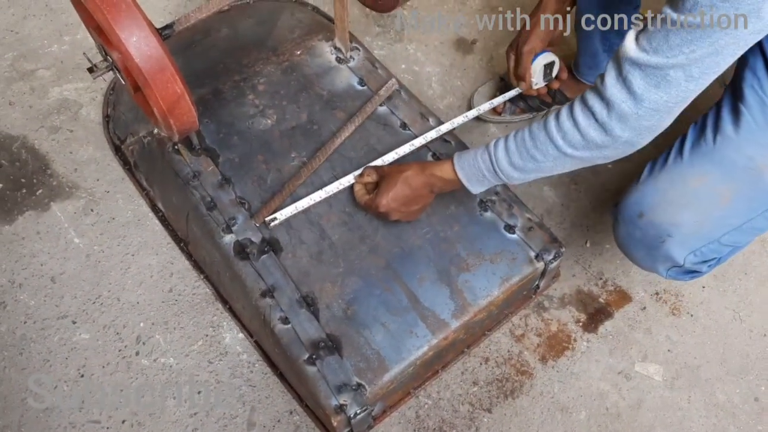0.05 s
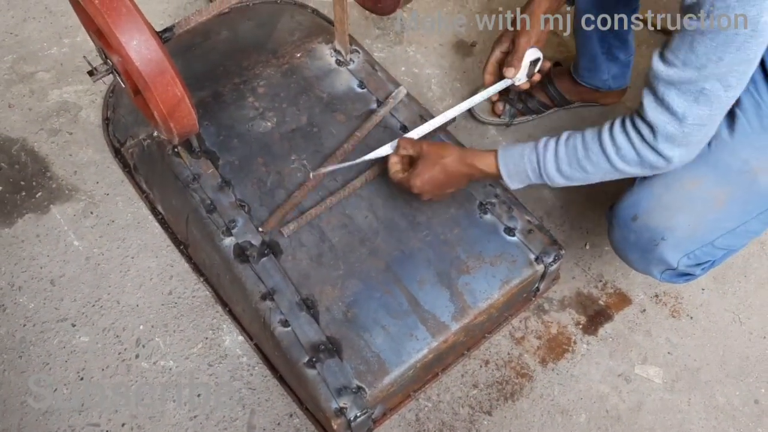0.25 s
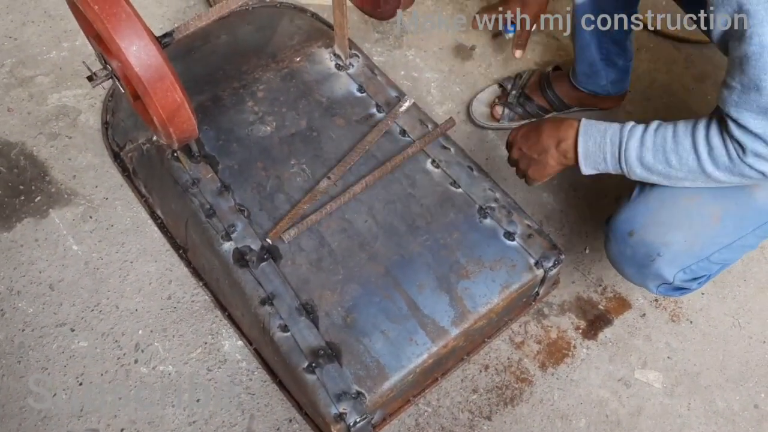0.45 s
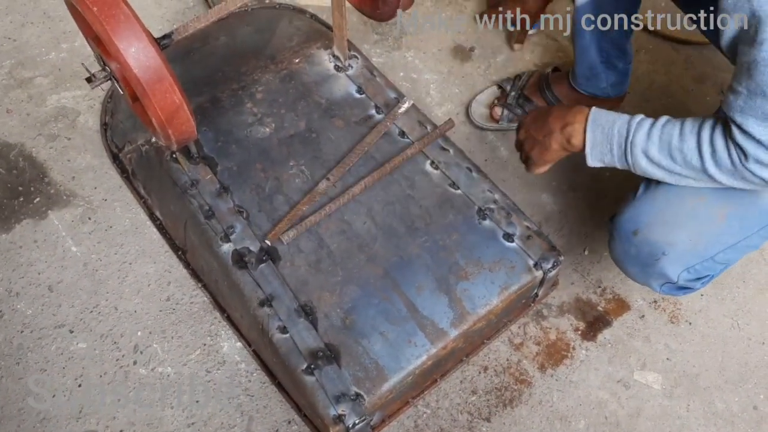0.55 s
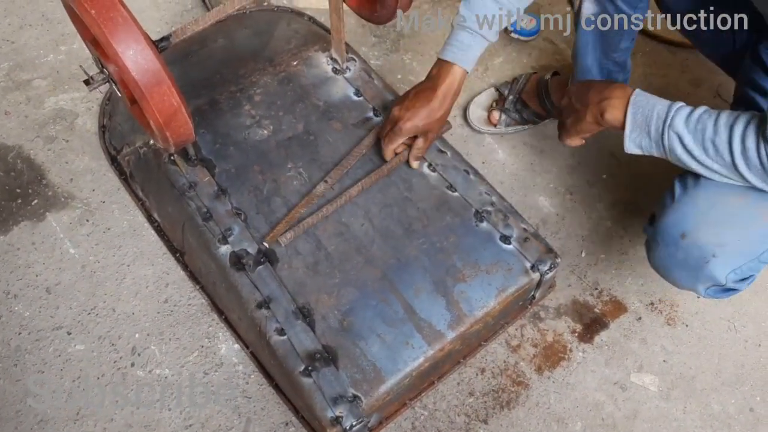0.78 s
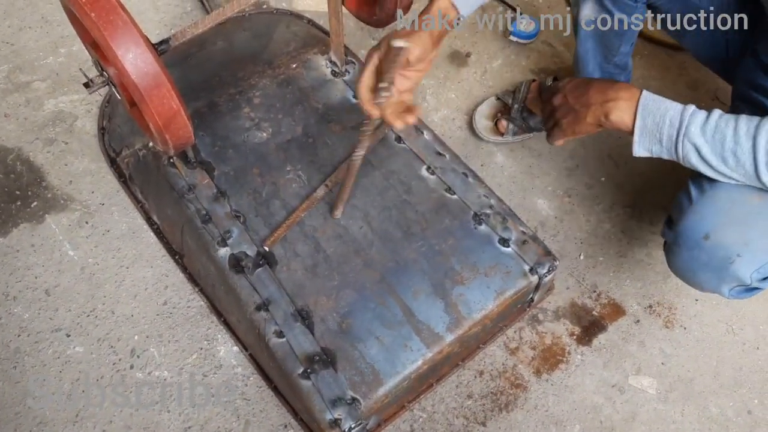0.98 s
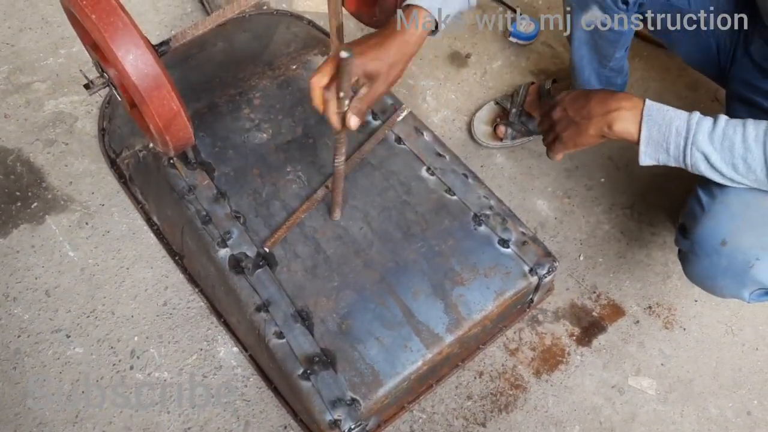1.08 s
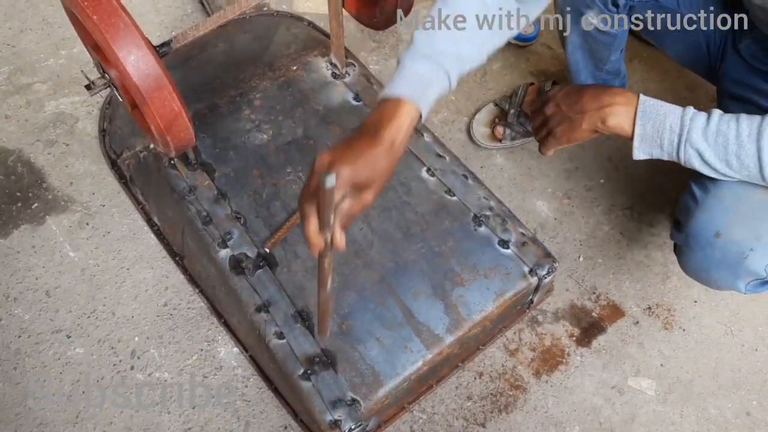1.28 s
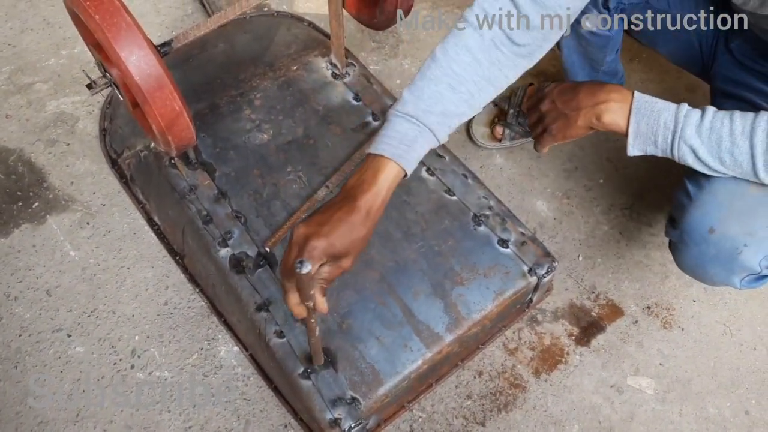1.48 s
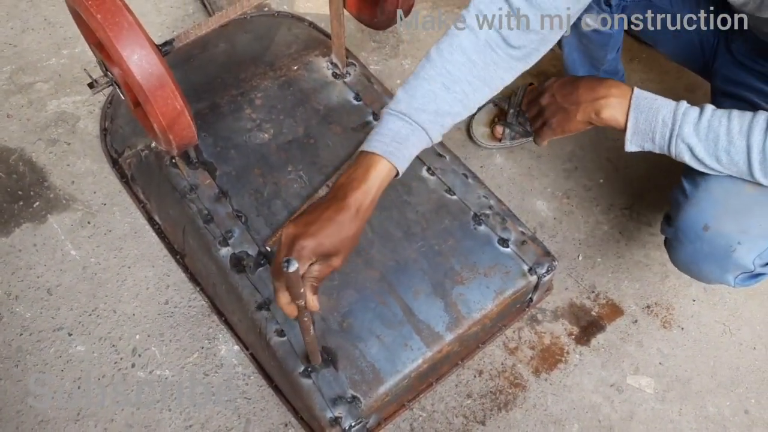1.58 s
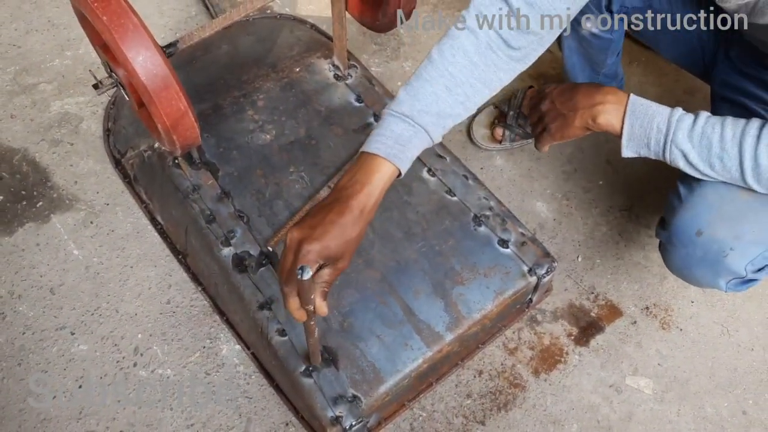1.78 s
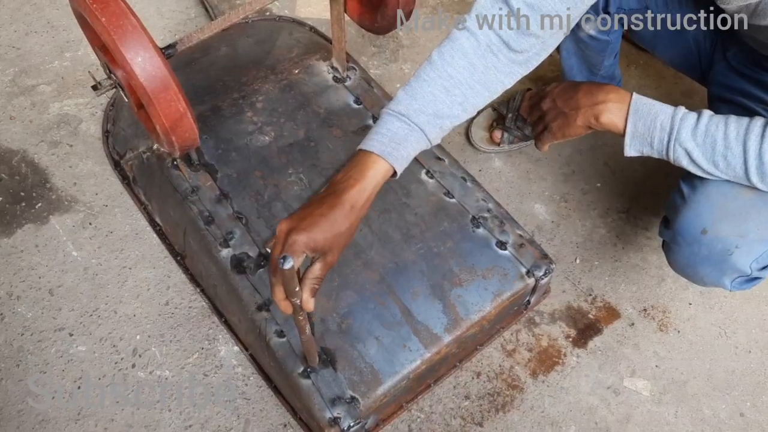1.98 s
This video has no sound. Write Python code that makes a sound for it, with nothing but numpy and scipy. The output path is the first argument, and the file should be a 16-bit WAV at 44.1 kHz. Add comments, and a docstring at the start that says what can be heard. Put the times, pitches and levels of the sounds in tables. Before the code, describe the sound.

A steel tape measure skids back over a metal tray and snaps into its case. A rod is then dragged off the tray with a chattering scrape and set down with a ringing knock, close by in a quiet workshop.

```python
"""A workshop, close to a welded steel tray, heard on a stereo pair of microphones.
A steel tape measure runs back over the tray, skids and slaps on it, and snaps into its case.
A metal rod is dragged off the tray, sticking and slipping, then stood on it with a bouncing knock
and a small nudge. The tray rings under both. Behind them lie low room noise, a hum with thin whines
and the rustle of a sleeve."""
import sys
import numpy as np
from scipy import signal
from scipy.fft import rfft, irfft
from scipy.io import wavfile
from scipy.ndimage import uniform_filter1d

SR = 44100
rng = np.random.default_rng(int(sys.argv[2]) if len(sys.argv) > 2 else 0)


def store_pcm(level_fs):
    """Save levels as 16-bit WAV."""
    pcm = np.round(np.clip(level_fs, -1, 1) * 32767).astype(np.int16)
    wavfile.write(sys.argv[1], SR, np.atleast_2d(pcm).T)


N = 90404
TIME = np.arange(N) / SR
RING_TIME = np.arange(26000) / SR

# blade sliding on the tray (time [s], level [dB])
BLADE_SLIDE = [(.18, -38), (.186, -23.5), (.206, -16.5), (.24, -16), (.265, -25), (.3, -27), (.315, -20.5),
               (.337, -27), (.355, -56.5), (.365, -54)]
# blade slapping the tray (time [s], strength [dB])
BLADE_SLAPS = [(.207, 6), (.216, 3), (.2335, 6), (.2395, 6.5), (.283, 9)]
# tray's dense ring under the blade (frequency [Hz], level [dB])
BLADE_COLOUR = [(50, -29.5), (100, -17), (150, 5), (300, -4.5), (700, -2), (1500, -10.5), (2400, -11),
                (4500, -17), (7000, -33.5), (16000, -36)]
# blade hissing through the mouth of the case (time [s], level [dB])
BLADE_HISS = [(.18, -48), (.22, -44), (.26, -26), (.285, -43), (.362, -51.5), (.366, -29.5), (.385, -30),
              (.405, -28), (.415, -55), (.44, -44)]
# spectrum of that hiss (frequency [Hz], level [dB])
HISS_COLOUR = [(100, -48.5), (1500, -19.5), (3000, -0.5), (5500, -7), (7500, 1), (10000, -7), (12000, 5),
               (16000, -3.5)]
# sharp clicks: the tape and its hook snapping into the case, then lighter clicks of the rod or hand (time [s],
# strength [dB])
SNAPS = [(.2217, 6), (.2235, 13.5), (.3935, 3.5), (.406, 0), (.579, -12.5), (.587, -18), (.598, -15),
         (.6225, -27.5)]
# spectrum of those clicks (frequency [Hz], level [dB])
SNAP_COLOUR = [(30, -45.5), (100, -25.5), (700, -29.5), (2500, 5.5), (5000, -2), (9500, -2.5), (12000, 2.5),
               (16000, 2.5)]


def tape_measure():
    """Up front, the blade skids and slaps over the tray, hisses into the case and clicks home."""
    body = tray(BLADE_COLOUR, UNDER_TAPE, modes_db=1, crack_db=-1, sustain=0.59)
    friction = grains(spread_db=1) * level(BLADE_SLIDE)
    skid = excite(friction + blows(BLADE_SLAPS), body)
    rush = rng.standard_normal(N) * level(BLADE_HISS)
    hiss = excite(rush, ring(HISS_COLOUR, crack_db=1, crack_s=0.001))
    clicks = excite(blows(SNAPS), ring(SNAP_COLOUR, crack_db=2, crack_s=0.0033))
    return skid + hiss + clicks


# rod's end striking the tray (time [s], strength [dB], low-pass cutoff [Hz], clack [dB])
KNOCKS = [(1.373, 16.5, 14000, 8), (1.3775, 6.5, 5000, 1.5), (1.3938, 0, 5000, 7.5), (1.3979, 12, 2500, 4),
          (1.4061, 9.5, 3050, -3)]
# tray's dense ring under the rod's end (frequency [Hz], level [dB])
KNOCK_COLOUR = [(55, -30.5), (105, -25), (155, 2), (300, -5), (550, 0.5), (1000, -9.5), (2200, -4.5),
                (3200, -11.5), (4800, -12), (5800, -26), (9000, -29.5), (16000, -34.5)]
# hard clack of metal on metal (frequency [Hz], level [dB])
CLACK_COLOUR = [(200, -20), (1200, -0.5), (2300, 1), (3200, -4), (4800, -2.5), (6200, -15), (16000, -31.5)]


def rod_knock():
    """The rod's end lands with a hard clack and bounces; the later contacts are softer and duller."""
    force = np.zeros(N)
    for start, db, cutoff_hz, _ in KNOCKS:
        pole = np.exp(-2 * np.pi * cutoff_hz / SR)
        force += signal.lfilter([1 - pole], [1, -pole], blows([(start, db)]))
    taps = blows([(start, clack_db) for start, _, _, clack_db in KNOCKS])
    clack = excite(taps, ring(CLACK_COLOUR, crack_db=3.5, crack_s=0.0019))
    body = tray(KNOCK_COLOUR, UNDER_ROD_END, modes_db=-3, crack_db=-4.5, sustain=0.98)
    return clack + excite(force, body)


# rod dragged off the tray (time [s], chatter [dB], grit [dB])
DRAG = [(.8, -46, -67), (.815, -29, -40), (.845, -30, -33), (.878, -30, -24.5), (.915, -24, -18),
        (.94, -27, -23), (.98, -24, -27.5), (.998, -23, -31.5), (1.014, -61.5, -55)]
# tray's dense ring under the slips (frequency [Hz], level [dB])
CHATTER_COLOUR = [(50, -49), (100, -11.5), (150, 4), (230, 13.5), (320, -5.5), (900, -4), (2000, -5),
                  (5000, -25.5), (16000, -44.5)]
# tray's dense ring under grinding rust (frequency [Hz], level [dB])
GRIT_COLOUR = [(30, -48), (100, -32.5), (300, -12), (950, -0.5), (1500, -13.5), (2050, -3), (3100, -5),
               (3900, -8), (6000, -17.5), (10000, -27), (16000, -35.5)]


def rod_drag(mean_slip_hz=156.87, jitter=0.16, grind_fall_db=18.5):
    """The rod sticks and slips unevenly; rust grinds under it, hardest just after each slip."""
    wander = evened(uniform_filter1d(rng.standard_normal(N), size=160))
    cycles = np.cumsum(mean_slip_hz * (1 + jitter * wander)) / SR
    onsets = np.diff(np.floor(cycles), prepend=0)  # one slip per cycle
    slips = evened(onsets * amp(2.5 * wander))
    rust = evened(grains(spread_db=3.5) * amp(-grind_fall_db * (cycles % 1)))
    chatter_body = tray(CHATTER_COLOUR, UNDER_DRAG, modes_db=-4, crack_db=2.5, sustain=0.95)
    grit_body = tray(GRIT_COLOUR, UNDER_DRAG, modes_db=0, crack_db=5.5, sustain=0.76)
    chatter = excite(slips * level(DRAG, column=1), chatter_body)
    grit = excite(rust * level(DRAG, column=2), grit_body)
    return chatter + grit


# light shifts of metal on the tray (start [s], length [s], rub [dB], scratch [dB])
NUDGES = [(0.563, 0.041, -46, -38), (0.591, 0.092, -39.5, -54.5), (1.617, 0.014, -40, -54.5),
          (1.63, 0.027, -43.5, -65)]
# spectrum of the dull rub (frequency [Hz], level [dB])
NUDGE_COLOUR = [(30, -39), (110, -11.5), (210, 10.5), (330, -7), (800, 2.5), (1500, -8.5), (2600, -13),
                (6000, -30.5), (16000, -42)]


def nudges():
    """Brief light scuffs of metal on the tray: a dull rub and a bright scratch."""
    rub, scratch = np.zeros((2, N))
    for start, length, rub_db, scratch_db in NUDGES:
        friction = swell(start, length) * grains(spread_db=1)
        rub += amp(rub_db) * friction
        scratch += amp(scratch_db) * friction
    body = tray(NUDGE_COLOUR, UNDER_ROD_END, modes_db=-6, crack_db=15, sustain=0.94)
    return excite(rub, body) + excite(scratch, ring(CLACK_COLOUR, crack_db=2.5, crack_s=0.0022))


# tray modes (frequency [Hz], base t60 [s], level under tape [dB], dragged rod [dB], rod's end [dB])
TRAY_MODES = [(165, .28, -13, -7, -9), (223, .2, -8, -15, -7), (322, .25, -25, -22, -5),
              (368, .17, -13, -20, -10), (452, .17, -19, -21, -14), (570, .15, -19, -21, -9),
              (705, .24, -10, -12, -17), (838, .35, -16, -18, -6), (885, .33, -17, -8, -13),
              (931, .28, -11, -9, -20), (1111, .33, -13, -15, -10), (1176, .42, -15, -21, -14),
              (1385, .36, -27, -19, -20), (1631, .22, -28, -24, -16), (1899, .24, -24, -9, -10),
              (2010, .16, -23, -15, -17), (2132, .17, -17, -21, -14), (2243, .17, -18, -21, -17),
              (2391, .17, -20, -17, -15), (2540, .2, -24, -18, -20), (2991, .16, -25, -19, -17)]
UNDER_TAPE, UNDER_DRAG, UNDER_ROD_END = 2, 3, 4  # level columns


def tray(colour, place, modes_db, crack_db, sustain):
    """The tray's response to a tap at one place; sustain scales how long its modes ring there."""
    modes = np.zeros((2, len(RING_TIME)))
    for row in TRAY_MODES:
        hz, t60 = row[:2]
        # each mode reaches the two microphones with its own phase gap
        phase_gap = np.arccos(np.clip(read(LIKENESS, hz), -1, 1))
        phases = phase_gap * rng.choice([-.5, .5]) * np.array([[1], [-1]])
        decay = amp(-60 * RING_TIME / (t60 * sustain))
        modes += amp(row[place] + modes_db) * unit(np.sin(2 * np.pi * hz * RING_TIME + phases) * decay)
    radiation = signal.butter(4, 148, "highpass", fs=SR, output="sos")  # the tray radiates little bass
    return unit(ring(colour, crack_db, crack_s=0.0087) + signal.sosfilt(radiation, modes))


# decay of the tray's dense upper modes and the room together (frequency [Hz], t60 [s])
RING_DECAY = [(60, 0.11), (200, 0.09), (500, 0.22), (1000, 0.28), (2000, 0.22), (4000, 0.18), (8000, 0.18),
              (16000, 0.028)]


def ring(colour, crack_db, crack_s):
    """Response to one tap: a short crack, then a dense ring that dies by band."""
    size = len(RING_TIME)
    hz, t, bands = signal.stft(diffuse(size), SR, nperseg=256)
    decay = amp(-60 * t / read(RING_DECAY, hz)[:, None])
    tail = signal.istft(bands * decay, SR, nperseg=256)[1][:, :size]
    crack = diffuse(size) * np.exp(-RING_TIME / crack_s)
    return unit(coloured(unit(tail) + amp(crack_db) * unit(crack), colour))


# workshop background (time [s], level [dB])
ROOM_LEVEL = [(0, -36), (.17, -41), (.35, -43.5), (.53, -50), (.68, -46.5), (.78, -46.5), (1.1, -42.5),
              (1.35, -43.5), (1.45, -40), (1.6, -55.5), (1.9, -58.5), (2.05, -54.5)]
# low room noise (frequency [Hz], level [dB])
ROOM_COLOUR = [(25, -24.5), (60, -7.5), (100, -1), (150, -12), (205, 5.5), (260, -2), (400, -4),
               (650, -7.5), (1200, -21.5), (2300, -21.5), (3300, -28), (6000, -34), (16000, -51)]
# faint metallic shimmer (frequency [Hz], level [dB])
SHIMMER_COLOUR = [(100, -34), (400, -7.5), (1200, 0), (2400, -1), (3200, -6.5), (4500, -13), (8000, -43)]


def room_tone(shimmer_db=-8):
    """The workshop behind the tray: low noise and a faint metallic shimmer rise and fall together."""
    shimmer = excite(rng.standard_normal(N), ring(SHIMMER_COLOUR, crack_db=-18.5, crack_s=0.0024))
    rumble = coloured(diffuse(N), ROOM_COLOUR)
    return (evened(rumble) + amp(shimmer_db) * evened(shimmer)) * level(ROOM_LEVEL)


# sleeve and hand moving (time [s], level [dB])
RUSTLE = [(0, -52.5), (.08, -81), (.13, -57), (.2, -75.5), (.5, -66.5), (.75, -80), (.81, -53.5),
          (1.05, -63), (1.18, -80), (1.3, -96)]
# spectrum of their rustle (frequency [Hz], level [dB])
RUSTLE_COLOUR = [(100, -23.5), (2000, -0.5), (7000, -5.5), (12000, -10), (16000, -16)]


def sleeve_rustle():
    """A moving arm makes soft swells of bright noise."""
    return evened(coloured(diffuse(N), RUSTLE_COLOUR)) * level(RUSTLE)


# workshop hum and thin whines (frequency [Hz], level relative to the hum [dB])
HUM = [(200, 0), (1637, -17), (1825, -14), (1880, -16), (2073, -13), (2256, -13), (2400, -17)]
# passing tones and high chirps (start [s], length [s], pitch [Hz], width [Hz], level [dB])
TONES = [(0.03, 0.064, 1690, 15, -50), (0.101, 0.062, 2313, 15, -47), (1.09, .09, 1635, 10, -53),
         (1.325, .045, 6300, 250, -63), (1.665, .1, 6050, 250, -74)]


def faint_tones(hum_db=-8):
    """Far back, a hum and thin whines follow the room's level; a few tones and chirps come and go."""
    tones = sum(amp(db + hum_db) * thin_tone(hz, width_hz=3) for hz, db in HUM) * level(ROOM_LEVEL)
    for start, length, hz, width_hz, db in TONES:
        tones += amp(db) * swell(start, length) * thin_tone(hz, width_hz)
    return tones


def thin_tone(hz, width_hz):
    """A narrow band of noise: a wavering tone."""
    band = np.exp(-((np.fft.rfftfreq(N, 1 / SR) - hz) / width_hz) ** 2)
    return evened(irfft(rfft(diffuse(N)) * band, N))


# likeness of the left and right microphones (frequency [Hz], correlation [0-1])
LIKENESS = [(30, 0.6), (70, 0.93), (190, 1), (380, 0.79), (700, 0.74), (1300, 0), (2400, 0.14), (5000, 0)]


def diffuse(size):
    """Noise at the two microphones, alike in the bass and unrelated in the treble."""
    left, unrelated = np.exp(2j * np.pi * rng.random((2, size // 2 + 1)))
    likeness = np.clip(read(LIKENESS, np.fft.rfftfreq(size, 1 / SR)), -1, 1)
    right = likeness * left + np.sqrt(1 - likeness ** 2) * unrelated
    return irfft(np.array([left, right]), size)


def grains(spread_db, catches_per_s=2500):
    """Friction: many tiny catches of uneven size."""
    sizes = amp(spread_db * np.minimum(rng.exponential(1, N), 4))
    signs = rng.choice([-1, 1], N)
    catches = rng.random(N) < catches_per_s / SR
    return evened(sizes * signs * catches)


def blows(rows):
    """One impulse per row of (time [s], strength [dB])."""
    force = np.zeros(N)
    for start, db in rows:
        force[round(start * SR)] += amp(db)
    return force


def excite(force, response):
    """Plays a force through a stereo response."""
    return signal.fftconvolve(force[None], response, axes=1)[:, :N]


def coloured(x, colour):
    """Minimum-phase filter with the given spectrum."""
    log_gain = np.log(amp(read(colour, abs(np.fft.fftfreq(4096, 1 / SR)))))
    spectrum = np.exp(np.conj(signal.hilbert(log_gain)))
    taps = np.fft.ifft(spectrum).real[:2048]
    return signal.fftconvolve(x, taps[None], axes=1)[:, :x.shape[1]]


def balanced(x, table):
    """Splits a left-right level difference between the channels."""
    tilt_db = read(table, np.fft.rfftfreq(2 * N, 1 / SR)) * np.array([[.5], [-.5]])
    return irfft(rfft(x, 2 * N) * amp(tilt_db))[:, :N]


def swell(start, length):
    """A half-sine rise and fall."""
    return np.sin(np.pi * np.clip((TIME - start) / length, 0, 1))


def level(curve, column=1):
    """Gain over time from one dB column; silent outside the curve."""
    rows = np.array(curve)
    return amp(np.interp(TIME, rows[:, 0], rows[:, column], left=-200, right=-200))


def read(table, hz):
    """Reads a table on a log-frequency axis."""
    table_hz, values = np.transpose(table)
    return np.interp(np.log(hz + 1), np.log(table_hz + 1), values)


def amp(db):
    """Decibels to gain."""
    return 10 ** (np.asarray(db) / 20)


def evened(x):
    """Scales to rms 1."""
    return x / np.sqrt(np.mean(x ** 2) + 1e-20)


def unit(x):
    """Scales to a mean energy of 1 per channel."""
    return evened(x) / np.sqrt(x.shape[-1])


# extra balance for the rod and the nudges (frequency [Hz], left minus right [dB])
ROD_BALANCE = [(1500, 0), (4400, 0), (8000, -6.5), (14000, 4)]


def scene():
    """Tape and rod on the tray in front, the workshop behind."""
    tape = tape_measure()
    rod = balanced(rod_drag() + rod_knock() + nudges(), ROD_BALANCE)
    return tape + rod + room_tone() + sleeve_rustle() + faint_tones()


# difference in colour between the microphones (frequency [Hz], left minus right [dB])
MIC_BALANCE = [(200, 0.5), (380, 1.5), (700, 1.5), (1300, -0.5), (2400, 2.5), (3300, -5.5), (4400, -6.5),
               (6000, -2), (10000, 1.5), (15000, 1)]


def record(dry):
    """The two microphones differ in colour, and a steep low-pass cuts the highest treble."""
    lowpass = signal.firwin(511, cutoff=15850, window=("kaiser", 9), fs=SR)
    return signal.oaconvolve(balanced(dry, MIC_BALANCE), lowpass[None], "same")


dry = scene()
out = record(dry)
store_pcm(out)
```